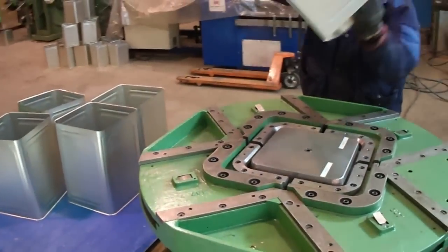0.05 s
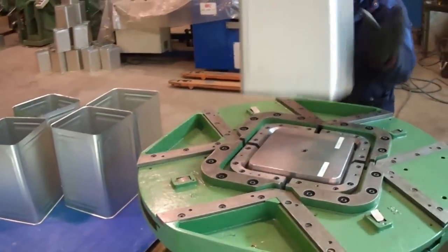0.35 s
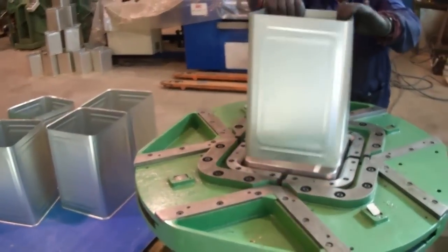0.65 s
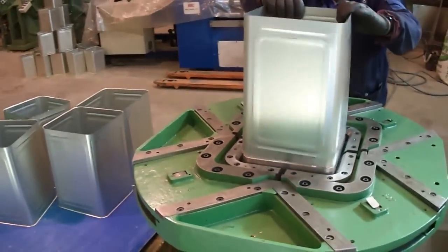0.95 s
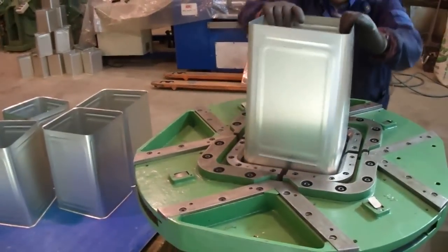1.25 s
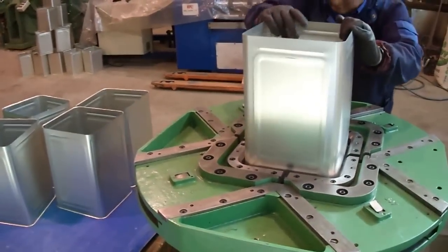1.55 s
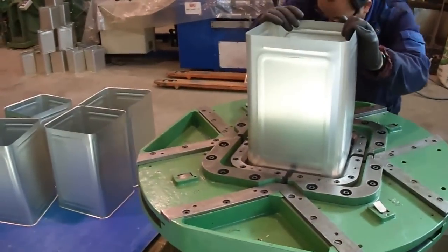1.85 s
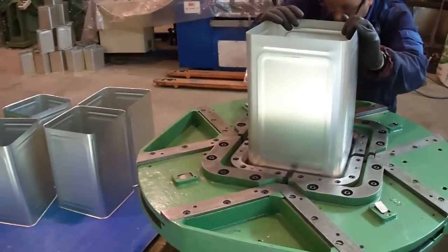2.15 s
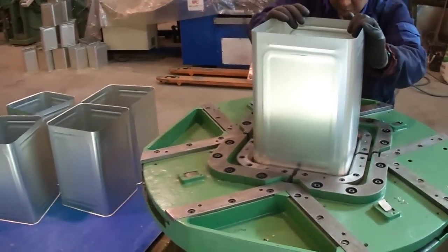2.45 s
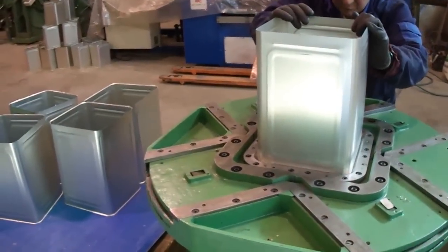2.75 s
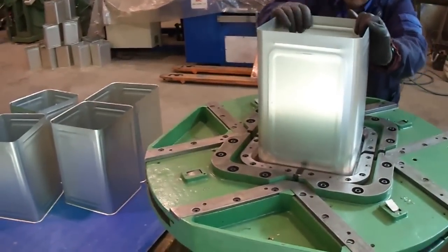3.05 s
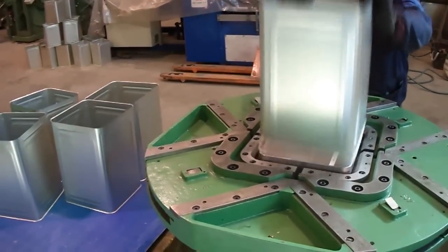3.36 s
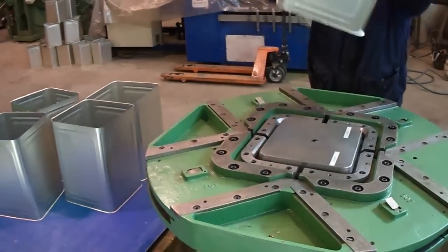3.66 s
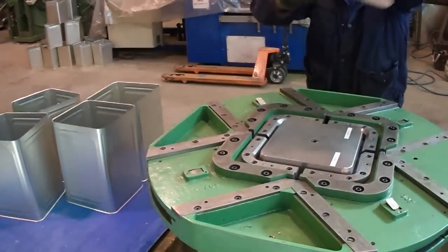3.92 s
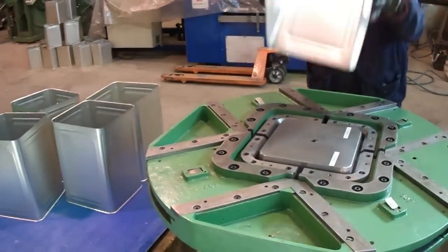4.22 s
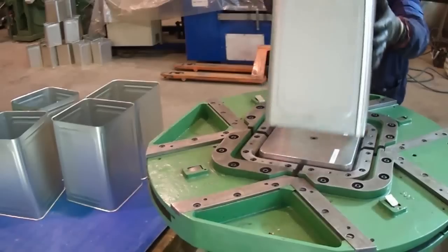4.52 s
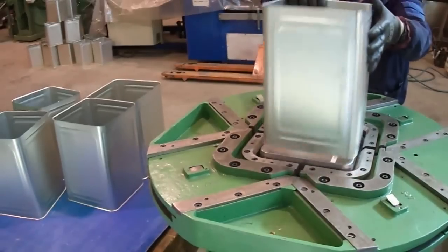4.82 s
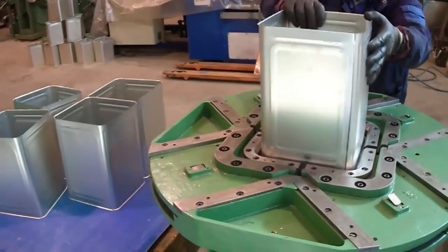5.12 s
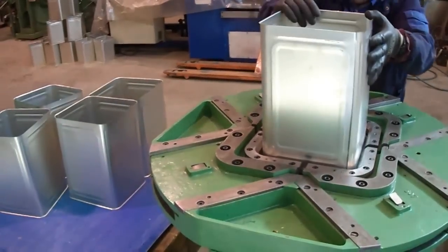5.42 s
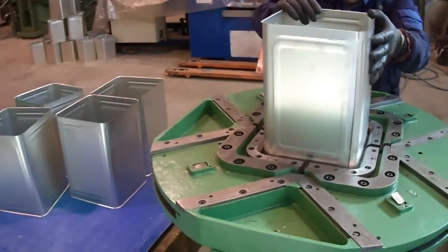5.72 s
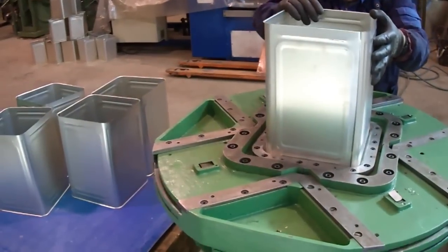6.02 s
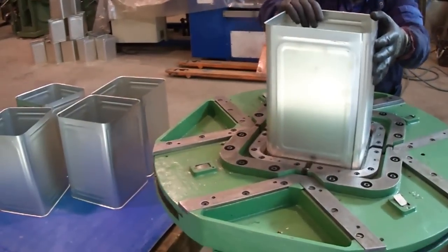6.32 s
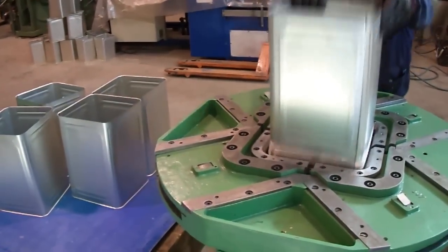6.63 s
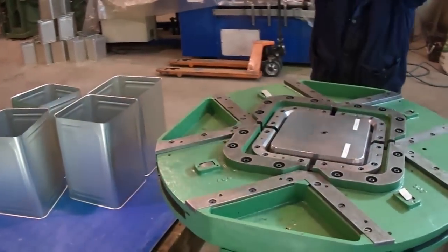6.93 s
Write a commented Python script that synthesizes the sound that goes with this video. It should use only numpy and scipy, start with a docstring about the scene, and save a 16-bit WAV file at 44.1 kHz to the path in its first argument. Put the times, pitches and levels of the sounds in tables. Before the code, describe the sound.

A hollow tin can is set on a steel fixture and pressed home with sharp clanks, scrapes and dull knocks, then pulled off with a very brief high squeal. A second can follows with more ringing clatter. A machine hums throughout and ticks quickly in runs in the echoing workshop. The microphone's level dips after the hardest clanks and creeps back.

```python
"""Tin cans on a steel fixture.

A square can is set down, pressed home with clanks and scrapes, and pulled off with a squeal;
a second one follows. Blows and slips shake four registers of thin sheet; the fixture knocks dully.
A machine hums and ticks six times a second in the echoing workshop.
The microphone's gain control ducks after each hard clank and creeps back."""
import sys
import numpy as np
from scipy import signal
from scipy.fft import rfft, irfft, next_fast_len
from scipy.io import wavfile
from scipy.ndimage import uniform_filter1d

SR = 44100
rng = np.random.default_rng(int(sys.argv[2]) if len(sys.argv) > 2 else 0)


def generate_wav(sig):
    """Save sig (samples, or channels by samples) to the path in sys.argv[1] as 16-bit PCM at SR."""
    pcm = np.round(np.clip(np.atleast_2d(sig).T, -1, 1) * 32767).astype(np.int16)
    wavfile.write(sys.argv[1], SR, pcm)


N = 312228
TIME = np.arange(N) / SR

# machine tones: pitch_hz, rms_db, waver_db
HUM_TONES = [(299.8, -37, 3), (147.3, -58.5, -1), (557, -53, 4), (1965, -55, -0.5)]
# shop noise colour: freq_hz, density_db
SHOP_SPECTRUM = [(30, -4.5), (90, -4.5), (150, -1.5), (220, -1.5), (310, 2.5), (390, 0.5), (460, 2),
                 (555, 7.5), (610, -10), (715, 2), (790, -5), (1030, 2.5), (1280, -7.5), (1450, -2.5),
                 (1720, -8.5), (2020, -6.5), (2450, -7), (3000, -6.5), (4800, -13.5), (5600, -22.5),
                 (6400, -67.5)]
# workshop reverberation: freq_hz, t60_s
ROOM_DECAY = [(200, 0.95), (1000, 0.54), (3000, 0.78), (6000, 0.66)]
# runs of steady ticking: start_s, end_s
TICK_SPANS = [(.4667, 2.55), (3.352, 4.95), (5.532, 5.95), (6.118, 6.53), (6.7405, 7.08)]
# contacts within a tick: delay_s, level_db
TICK_CONTACTS = [(-.004, -5), (0, -4), (.0035, -5.5), (.013, -11.5)]
# modes rung by a tick: pitch_hz, level_db, t60_s
TICK_RESONANCES = [(690, -8, 0.051), (950, -3.5, 0.048), (1070, 2, 0.014), (1160, -7, 0.022)]
# can dropping home: start_s, level_db
SEATINGS = [(2.3272, -14), (2.452, -13), (5.7596, -10.5)]
# dull fixture modes: pitch_hz, level_db, t60_s
FIXTURE_RESONANCES = [(143, -14.5, 0.053), (244, -13, 0.1), (410, -6, 0.063), (527, -2.5, 0.053),
                      (710, 0, 0.014)]
# seam squeal: peak_s, swell_s, release_s, peak_rms_db
SQUEAL = (3.5, 0.014, 0.0077, -23.3)
# squeal resonances: pitch_hz, width_hz, level_db
SQUEAL_BANDS = [(4000, 370, -5), (4600, 170, 5), (5000, 170, 3.5), (5800, 220, 0)]
# can registers, panel boom to rim zing: low_hz, high_hz, quick_t60_s, linger_db
CAN_REGISTERS = [(201, 396, 0.034, -4), (741, 1343, 0.06, -3.5), (1277, 2666, 0.11, -13.5),
                 (2950, 6380, 0.1, -10)]
# clear can modes: pitch_hz, level_db, t60_s
CLEAR_MODES = [(240, -5.5, 0.15), (278, -5, 0.22), (305.6, -5, 0.07), (333, -11, 0.13), (383.5, -13, 0.41),
               (781, -4.5, 0.28), (831, -9.5, 0.21), (908, -15, 0.099), (1009.5, -5, 0.1),
               (1086, -11, 0.08), (1270, -19, 0.2), (1376, -14, 0.029), (1691, -13, 0.11),
               (2300, -12, 0.38), (2480, -18, 0.15), (2940, -14, 0.059), (3070, -19, 0.19),
               (4190, -26.5, 0.16), (4650, -14, 0.14)]
# dense sheet modes between them: freq_hz, density_db
SHEET_SPECTRUM = [(150, -14.5), (245, 4), (420, 0), (600, 12), (800, -2), (1050, 1.5), (1400, -3),
                  (1700, 0.5), (2000, -2), (3000, 7.5), (4500, 11.5), (5300, 4.5), (6100, -3.5),
                  (6700, -34.5)]
# can response to any drive: freq_hz, gain_db
CAN_RESPONSE = [(280, 2.5), (970, 1.5), (2000, -0.5), (4300, 0.5)]
# grip strain bending the modes: time_s, pitch_ratio
GRIP_STRAIN = [(0, 1.015), (.9, 1.005), (1.44, 1.006), (2.66, 0.96), (3.0, 1.044), (3.5, 1.03),
               (5.0, 1.015), (5.24, 1), (6.05, .99), (6.5, .97)]
# can sliding, rattling or flexing: start_s, length_s, level_db, tilt_db_per_oct, favoured_hz, boom_db
CAN_SCRAPES = [(-.01, .16, -37, -8.5, 1200, -6), (.33, 0.04, -46.5, -5, 4200, -1.5),
               (0.756, 0.043, -30.5, -2.5, 4200, -3), (0.827, 0.046, -32, -4.5, 830, -2.5),
               (0.947, 0.035, -36.5, 0.5, 990, 4), (1.059, 0.12, -33.2, 1.7, 267, 2.5),
               (1.427, 0.0063, -33, 2, 2300, -7), (2.425, 0.024, -33, 3, 1600, -7),
               (2.56, 0.1, -35.5, 0, 1020, -13), (2.675, 0.049, -32.5, -7, 850, -1.5),
               (2.739, .04, -45.5, -8.5, 950, -1), (2.872, .03, -51, -4.5, 300, 2),
               (3.005, .04, -41.5, 1.5, 1700, -1.5), (3.17, .11, -50.5, -1, 300, 1.5),
               (3.315, 0.054, -48.5, -3, 1100, 3.5), (3.49, 0.06, -48, -7, 340, -1.5),
               (3.991, 0.055, -44, -4, 1150, -2.5), (4.77, 0.031, -41.5, -1, 800, -1),
               (4.895, 0.032, -48.5, 0.5, 4200, 6.5), (5.009, 0.103, -32, 3, 800, 7.5),
               (5.137, 0.03, -26.5, 4.5, 1018, 6), (5.158, 0.064, -28.5, -0.5, 245, 1.5),
               (5.783, 0.016, -38, -2, 3010, 0), (5.852, 0.034, -37, 1, 2300, -9),
               (5.955, 0.025, -27.5, 2, 1000, -9), (6.053, 0.02, -30.5, -5.5, 1400, -7),
               (6.539, 0.092, -46, -5.5, 303, -1.5)]
# can striking the fixture:
# start_s, strength_db, tilt_db_per_oct, favoured_hz, favour_db, boom_db, crack_db, crack_s
CAN_BLOWS = [(0.7349, -23.5, 0.8, 1710, 16, -8.5, -5.5, .007), (1.047, -34, 0, 4600, -2, -3, -17, .004),
             (1.1062, -29, -1, 1000, 6, -3.5, -15, .003), (1.436, -20.5, -1, 1017, 10, -1, 13, .0004),
             (2.327, -26, 1, 790, 3, 5, -7.5, .0015), (2.343, -34, 1.5, 3000, -1, -10, -14, .003),
             (2.3878, -25, 5, 2940, 10.5, -8.5, 0, .003), (2.415, -33, 1, 3070, 2.5, -3, -12, .003),
             (2.449, -30, 2, 4530, -4, -2, -6, .005), (2.543, -29.5, 4, 4600, 1, 9, -11, .003),
             (2.657, -23, -1.8, 950, 8, -4.5, -5.5, .008), (2.748, -40.5, -4.5, 1000, 6, -2.5, -23, .003),
             (2.9921, -28.3, -0.9, 1250, 3.5, -3.5, -5, .007), (3.036, -41, 0, 1010, 4.5, 4, -20, .003),
             (3.11, -41.5, -5.5, 1070, 4, 0, -15.5, .003), (3.297, -36.3, -0.5, 2200, 4, 0, -16, .008),
             (4.741, -39.5, -0.5, 1650, 14.5, -1, -21, .004), (4.9901, -25.5, 5, 930, -6, 5, 1.5, .0015),
             (4.9928, -23, 3.5, 1740, 19, -5, 2.5, .0005), (5.141, -31, -3, 1030, 16, -8, -22, .003),
             (5.2347, -23, -1, 1034, 15, -4, -10, .004), (5.247, -32, -8, 760, 20, -12, -22, .002),
             (5.7591, -26.5, 3, 767, -7.5, 7, -6, .001), (5.7612, -29, 0, 1010, -2, 0, 1.5, .001),
             (5.773, -34.5, 1, 4190, 2, 6, -20, .004), (5.8201, -26.5, 5.5, 4560, 2, -5, 4, .004),
             (5.849, -31.5, 3, 2480, 19.5, -4, -12, .003), (5.882, -29.5, 0, 2480, 4, -2, -6, .005),
             (5.978, -30.5, 3.5, 4560, 1.5, 4.5, -12, .006), (6.043, -20, -1.5, 290, 13, -2.5, -9, .005),
             (6.379, -28, 0, 1380, -1, 0, -19, .004), (6.723, -36.5, 0, 2300, -14, -3.5, -21, .004)]
# overloaded input sitting at an offset: start_s, end_s
OVERLOAD_SPANS = [(1.437, 1.848), (2.549, 2.617), (2.660, 2.695), (5.822, 5.947), (5.977, 6.181)]

TILT_PIVOT_HZ = 1460


def from_db(db):
    return 10 ** (np.asarray(db) / 20)


def unit_energy(x):
    return x / np.sqrt(np.sum(x ** 2) + 1e-20)


def at_hz(points, hz):
    """Table lookup on a log-frequency axis."""
    points = np.array(points)
    return np.interp(np.log(np.maximum(hz, 1)), np.log(points[:, 0]), points[:, 1])


def near(hz, centre_hz, width_oct):
    """Bell curve, 1 at the centre."""
    return np.exp(-(np.log2(hz / centre_hz) / width_oct) ** 2)


def band(x, low_hz, high_hz, order=2):
    sos = signal.butter(order, [low_hz, high_hz], "band", fs=SR, output="sos")
    return signal.sosfilt(sos, x + 1e-18)


def low_pass(x, hz):
    return signal.sosfilt(signal.ellip(10, .3, 80, hz, fs=SR, output="sos"), x)


def smooth(x, time_s):
    """One-pole lag."""
    pole = np.exp(-1 / (time_s * SR))
    return signal.lfilter([1 - pole], [1, -pole], x)


def noise(spectrum, size):
    """Coloured noise, rms 1."""
    n = next_fast_len(size)
    gain = from_db(at_hz(spectrum, np.fft.rfftfreq(n, 1 / SR)))
    shaped = irfft(rfft(rng.standard_normal(n)) * gain, n)[:size]
    return shaped / shaped.std()


def drift(per_s):
    """Slow random wander, spread about 1."""
    return np.interp(TIME * per_s, np.arange(1000), rng.standard_normal(1000))


def contacts(size, per_s):
    """Tiny random metal-on-metal impulses."""
    return (rng.random(size) < per_s / SR) * rng.standard_normal(size)


def fade(t, t60_s):
    return from_db(-60 * t / t60_s)


def ring(modes, t):
    """Sum of decaying sines."""
    return sum(from_db(db) * fade(t, t60_s) * np.sin(2 * np.pi * hz * t) for hz, db, t60_s in modes)


def varied(modes, spread_db, detune):
    """Modes scattered in pitch and level."""
    draws = rng.standard_normal((len(modes), 2))
    return [(hz * (1 + detune * a), db + spread_db * b, t60_s)
            for (hz, db, t60_s), (a, b) in zip(modes, draws)]


def add(track, start_s, sound):
    """Mix in a sound; start_s may be negative."""
    start = min(int(start_s * SR), N - 1)
    part = sound[max(-start, 0):N - start]
    track[max(start, 0):max(start, 0) + len(part)] += part


def machine(whirr_hz=(1975, 2045), whirr_db=-52, flutter_db=3, shop_db=-41.5):
    """Wavering hum, a fluttering whirr and broad shop noise."""
    hum = np.zeros(N)
    for hz, rms_db, waver_db in HUM_TONES:
        amplitude = np.sqrt(2) * from_db(rms_db + waver_db * np.tanh(drift(13)))
        phase_wander = waver_db / 10 * drift(8.9)
        hum += amplitude * np.sin(2 * np.pi * hz * TIME + phase_wander)
    whirr = band(rng.standard_normal(N), *whirr_hz)
    whirr *= from_db(whirr_db + flutter_db * drift(25)) / whirr.std()
    shop = from_db(shop_db + 0.11 * drift(14)) * noise(SHOP_SPECTRUM, N)
    return hum + whirr + shop


def workshop(x, build_s=0.0069, top_hz=8000):
    """Diffuse echoes build up and die away, slowest in the bass."""
    t, edges_hz = TIME[:SR], np.geomspace(100, top_hz, 7)
    tail = np.zeros(len(t))
    for low_hz, high_hz in zip(edges_hz, edges_hz[1:]):
        t60_s = at_hz(ROOM_DECAY, np.sqrt(low_hz * high_hz))
        tail += band(rng.standard_normal(len(t)), low_hz, high_hz) * fade(t, t60_s)
    response = unit_energy(tail * (1 - np.exp(-t / build_s))) * np.sqrt(2 * top_hz / SR)
    return signal.fftconvolve(x, response)[:N]


def ticks(period_s=.1676, level_db=-27, spread_db=.8):
    """Each machine cycle: a light touch, a dry knock, two small bounces."""
    t, out = TIME[:SR // 20], np.zeros(N)
    for start_s, end_s in TICK_SPANS:
        for tick_s in np.arange(start_s, end_s, period_s):
            tick_db = level_db + spread_db * rng.standard_normal()
            for delay_s, touch_db in TICK_CONTACTS:
                touch_s = tick_s + delay_s * rng.uniform(0.47, 1.148)
                modes = varied(TICK_RESONANCES, spread_db=2, detune=0.017)
                add(out, touch_s, from_db(tick_db + touch_db) * ring(modes, t))
    return band(out, 540, 1450, order=4)


def fixture():
    """The can drops home; the heavy fixture knocks dully."""
    out = np.zeros(N)
    for start_s, level_db in SEATINGS:
        add(out, start_s, from_db(level_db) * ring(FIXTURE_RESONANCES, TIME[:SR // 8]))
    return band(out, 96, 2000)


def seam_squeal(slips_per_s=2500):
    """Stick-slip of the seam on the fixture's edge drives a few high resonances."""
    peak_s, swell_s, release_s, peak_rms_db = SQUEAL
    slips = contacts(N, slips_per_s)
    squeal = sum(from_db(db) * unit_energy(band(slips, hz - width_hz / 2, hz + width_hz / 2, order=1))
                 for hz, width_hz, db in SQUEAL_BANDS)
    envelope = np.exp(-np.maximum((peak_s - TIME) / swell_s, (TIME - peak_s) / release_s))
    squeal = unit_energy(band(squeal, 3600, 5500) * envelope)
    return from_db(peak_rms_db) * squeal * np.sqrt((swell_s + release_s) / 2 * SR)


def register(low_hz, high_hz, quick_t60_s, linger_db, linger_t60_s=0.4):
    """One band of thin sheet: dense vibration, two-stage decay, clear modes."""
    t = TIME[:SR // 3]
    dense = band(noise(SHEET_SPECTRUM, N), low_hz, high_hz, order=3)
    decay = fade(t, quick_t60_s) + from_db(linger_db) * fade(t, linger_t60_s)
    return dense, decay, [mode for mode in CLEAR_MODES if low_hz < mode[0] < high_hz]


def register_levels(level_db, tilt_db_per_oct, favoured_hz, boom_db, lift_db=5.5, tilt_floor_hz=526):
    """Hard contact tilts the spectrum up, the contact point lifts one region, flexing panels boom."""
    centres_hz = np.array([np.sqrt(low * high) for low, high, *_ in CAN_REGISTERS])
    tilt_db = tilt_db_per_oct * np.log2(np.maximum(centres_hz, tilt_floor_hz) / TILT_PIVOT_HZ)
    contact_db = lift_db * near(centres_hz, favoured_hz, width_oct=0.97)
    levels_db = level_db + tilt_db + contact_db + at_hz(CAN_RESPONSE, centres_hz)
    levels_db[0] += boom_db
    return levels_db


def dense_ring(dense, decay):
    """Each contact point stirs its own mix of dense modes."""
    start = rng.integers(0, N - len(decay))
    return unit_energy(dense[start:start + len(decay)] * decay)


def clear_ring(modes, start_s, favoured_hz, favour_db):
    """The contact point weights modes near one pitch; strain shifts all pitches together."""
    t, out = TIME[:SR // 3], np.zeros(SR // 3)
    bend = np.interp(start_s, *np.transpose(GRIP_STRAIN))
    for k, (hz, db, t60_s) in enumerate(varied(modes, spread_db=1, detune=.008)):
        gain = from_db(db + favour_db * near(hz, favoured_hz, width_oct=0.25))
        out += (-1) ** k * gain * unit_energy(ring([(hz * bend, 0, t60_s)], t))
    return out


def scrapes(registers, slips_per_s=1100, edge_s=.011, crunch_db=5, clear_db=-4.5):
    """A run of uneven slips swells, holds and ends, shaking the sheet."""
    t, out = TIME[:SR // 4], np.zeros(N)
    for start_s, length_s, level_db, tilt_db_per_oct, favoured_hz, boom_db in CAN_SCRAPES:
        stroke = np.clip(np.minimum(t, length_s + edge_s - t) / edge_s, 0, 1)
        force = contacts(len(t), slips_per_s) * stroke
        force *= from_db(crunch_db * rng.uniform(-0.6, 1, len(t)))
        levels_db = register_levels(level_db, tilt_db_per_oct, favoured_hz, boom_db)
        for (dense, decay, modes), db in zip(registers, levels_db):
            response = dense_ring(dense, decay)
            response += from_db(clear_db) * clear_ring(modes, start_s, favoured_hz, favour_db=5)
            sound = unit_energy(signal.fftconvolve(force, response)) * np.sqrt(length_s * SR)
            add(out, start_s - edge_s, from_db(db) * sound)
    return out


def cracks(snaps_per_s=2500, tilt_share=0.62):
    """First instant of a blow: the panel snaps in a short, strong burst."""
    t, out = TIME[:SR // 40], np.zeros(N)
    pop, edge, rim, bite = (1000, -2, .0085), (2300, -4, .004), (4300, -10, .004), (5600, -15, .004)
    for start_s, _, tilt_db_per_oct, _, _, _, crack_db, crack_s in CAN_BLOWS:
        burst = contacts(len(t), snaps_per_s) * (t < crack_s)
        burst[0] += 1
        for hz, db, t60_s in (pop, edge, rim, bite):
            tilt_db = tilt_share * tilt_db_per_oct * np.log2(hz / TILT_PIVOT_HZ)
            mode = ring([(hz, crack_db + db + tilt_db, t60_s)], t)
            add(out, start_s, np.linalg.norm(mode) * unit_energy(np.convolve(burst, mode)))
    return band(out, 570, 5300, order=3)


def blows(registers, chatter_per_s=2200, firm_chatter_s=.0025, firm_db=-20.5, halving_db=15.5,
          clear_db=-3):
    """A touch, then chatter while the clear modes ring on; a firmer blow seats the can sooner."""
    t, out = TIME[:SR // 8], np.zeros(N)
    attack_samples = int(.03 * SR)
    for start_s, strength_db, tilt_db_per_oct, favoured_hz, favour_db, boom_db, _, _ in CAN_BLOWS:
        chatter_s = firm_chatter_s * 2 ** ((firm_db - strength_db) / halving_db)
        force = unit_energy(contacts(len(t), chatter_per_s) * np.sqrt(t) * np.exp(-t / chatter_s))
        force[0] += 0.7  # first touch
        levels_db = register_levels(strength_db, tilt_db_per_oct, favoured_hz, boom_db)
        for (dense, decay, modes), db in zip(registers, levels_db):
            clear = from_db(clear_db) * clear_ring(modes, start_s, favoured_hz, favour_db)
            chatter = signal.fftconvolve(force, dense_ring(dense, decay))[:len(clear)]
            sound = unit_energy(chatter) + clear
            add(out, start_s, from_db(db) * sound / sound[:attack_samples].std())
    return out


def can():
    """Scrapes and blows shake the same four registers."""
    registers = [register(*row) for row in CAN_REGISTERS]
    return band(blows(registers) + scrapes(registers), 110, 6300)


def scene(can_db=0.5, tin_send_db=-6, impact_send_db=-14, tick_send_db=-6):
    """Can, fixture and machine in the workshop; mono."""
    tin = from_db(can_db) * can() + seam_squeal()
    impacts = cracks() + fixture()
    ticking = ticks()
    send = from_db(tin_send_db) * tin + from_db(impact_send_db) * impacts
    echoes = workshop(send + from_db(tick_send_db) * ticking)
    return (tin + impacts + ticking + echoes + machine())[None]


def gain_control(x, threshold_db=-16, attack_s=.0016, release_db_per_s=15):
    """Gain drops fast above the threshold and recovers at a steady rate."""
    level_db = 10 * np.log10(np.maximum(uniform_filter1d(x ** 2, size=66), 1e-12))
    excess_db = np.maximum(level_db - threshold_db, 0)
    recovery_db = release_db_per_s * TIME
    cut_db = np.maximum.accumulate(excess_db + recovery_db, axis=-1) - recovery_db
    return x * from_db(-smooth(cut_db, attack_s))


def offset_thumps(depth=0.039, leak_s=0.63, edge_s=0.0003):
    """Timed spells of input offset leak away, with a soft thump at each end."""
    steps = sum(-depth * ((TIME > start_s) & (TIME < end_s)) for start_s, end_s in OVERLOAD_SPANS)
    leak = np.exp(-1 / (leak_s * SR))
    return smooth(signal.lfilter([1, -1], [1, -leak], steps), edge_s)


def record(dry, input_clip=.65, input_hz=6700, output_clip=.7, output_hz=16000):
    """Gain control, overload, thumps, narrow bandwidth; a second clip brightens the tallest peaks."""
    overloaded = np.clip(gain_control(dry), -input_clip, input_clip) + offset_thumps()
    narrow = low_pass(overloaded, input_hz)
    return low_pass(np.clip(narrow, -output_clip, output_clip), output_hz)


dry = scene()
out = record(dry)
generate_wav(out)
```